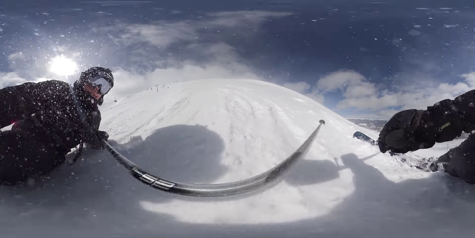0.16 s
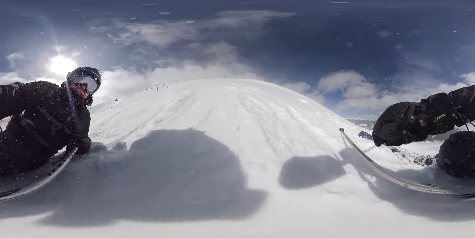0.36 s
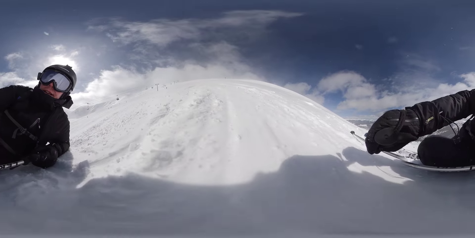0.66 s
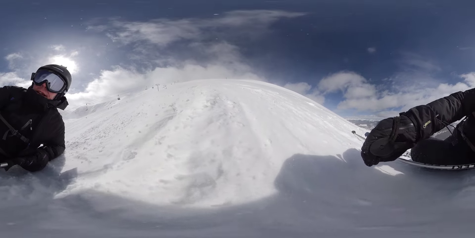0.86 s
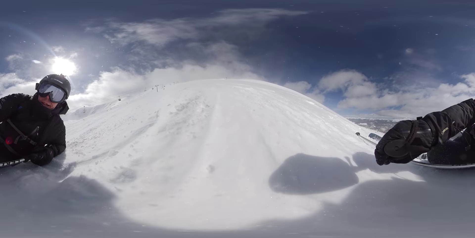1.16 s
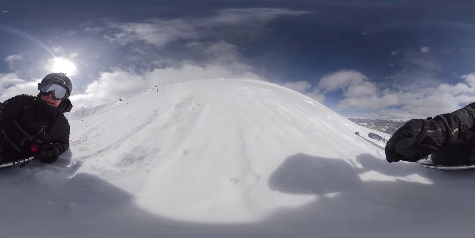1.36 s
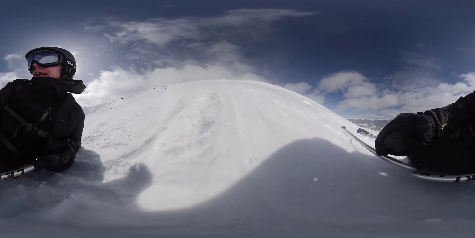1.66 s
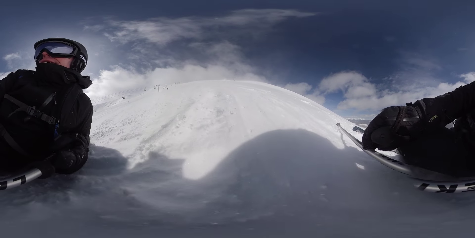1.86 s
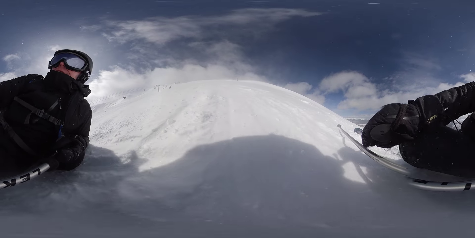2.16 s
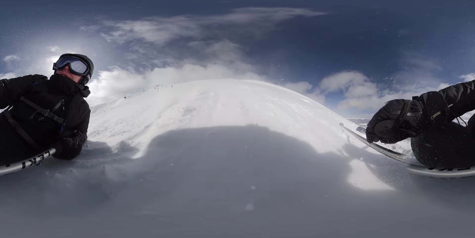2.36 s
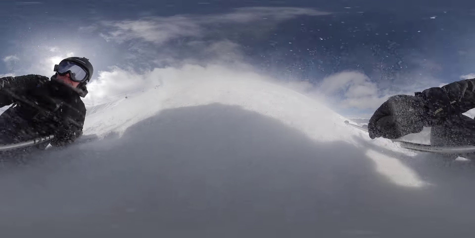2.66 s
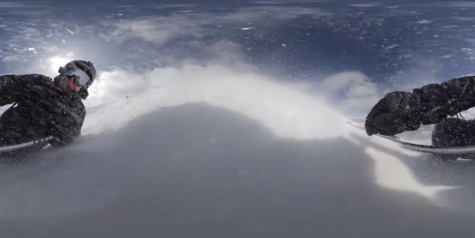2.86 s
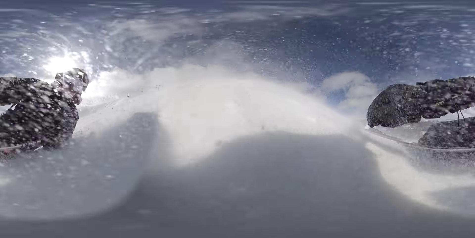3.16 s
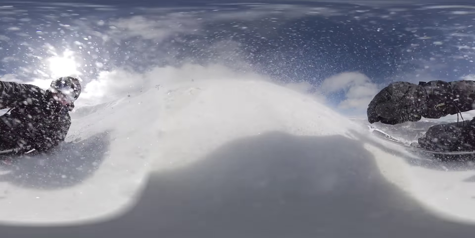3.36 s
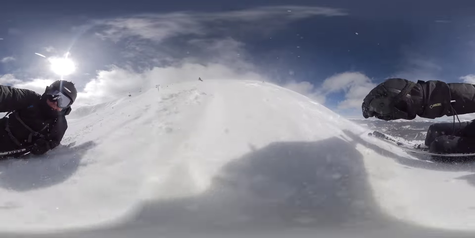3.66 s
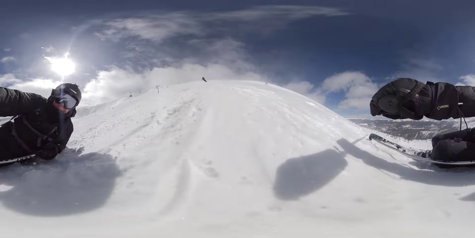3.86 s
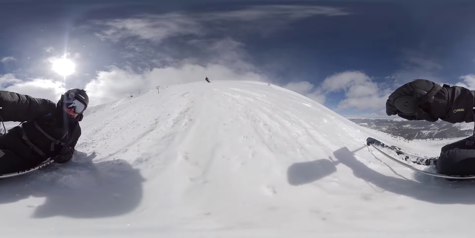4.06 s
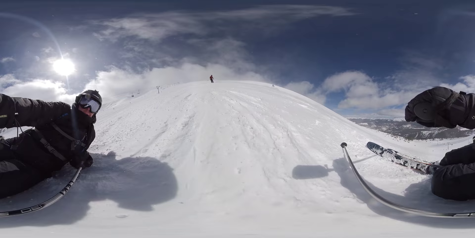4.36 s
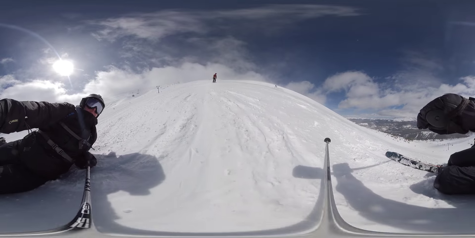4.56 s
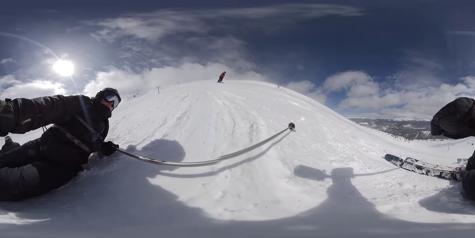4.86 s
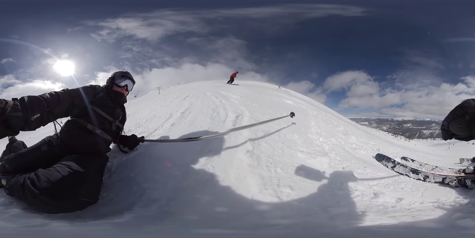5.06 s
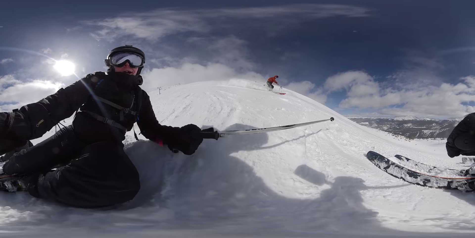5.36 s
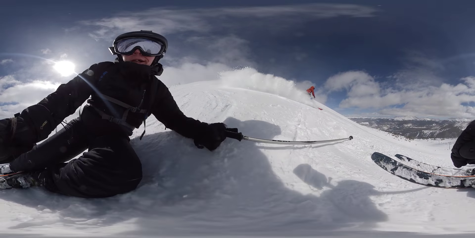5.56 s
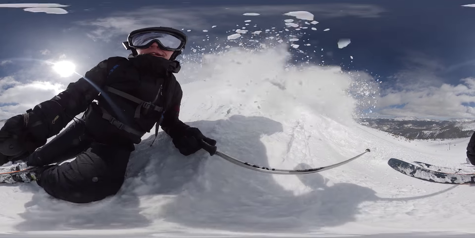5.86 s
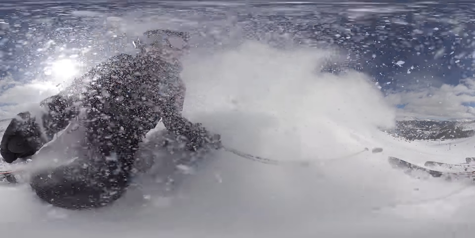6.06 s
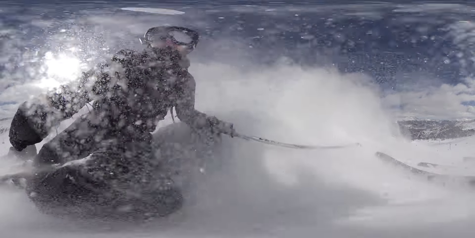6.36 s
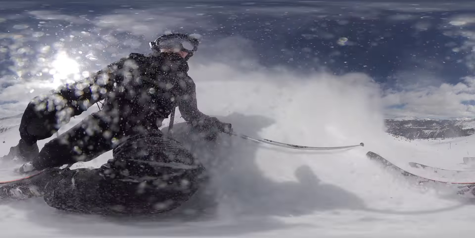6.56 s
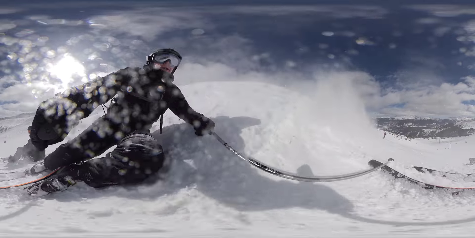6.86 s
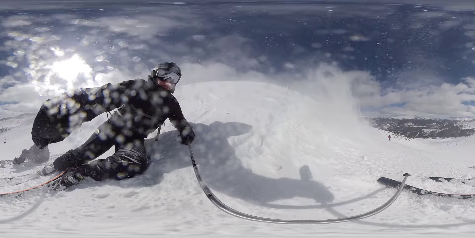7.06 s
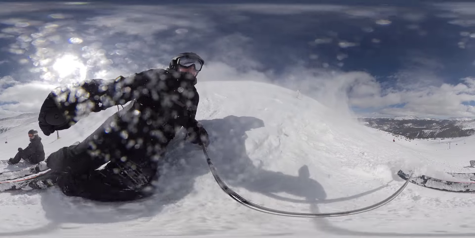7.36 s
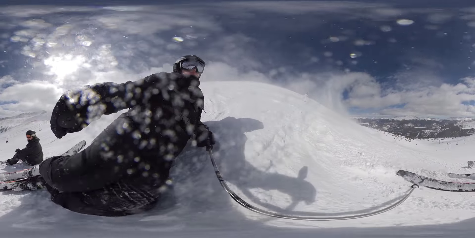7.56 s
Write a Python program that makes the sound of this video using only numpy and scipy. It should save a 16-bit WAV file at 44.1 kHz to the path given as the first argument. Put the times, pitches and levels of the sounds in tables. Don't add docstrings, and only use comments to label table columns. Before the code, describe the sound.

On an open snow slope, a microphone in a small hard housing rides close to skis. Faint powder hiss and low soft wind open, with muffled thuds; clumps crunch with a click around 0.5-0.6 s and dull knocks near 0.75. Ticks follow, a crunch at 1.35, then a very loud cluster of cracks, lumps and a deep thud at 1.66-1.77. Hiss continues with pellets until 2.5 s, when a dense, bright rush of spray bursts in, full of crushed clumps, with hollow gritty scrapes and hard knocks at 3.1-3.55. It ends by 3.8. Quiet follows, with faint wind and small rattling clicks at 4.1-4.7. A second skier's rush grows by 5.5, a hard crack lands at 5.64, three sharp knocks at 6.02-6.1 with a faint brief pole hum, and fine hiss at 6.3. Near silence, then taps and crunch at 7.1 and light gliding hiss to the end.

```python
import sys
import numpy as np
from scipy import signal
from scipy.fft import rfft, irfft
from scipy.io import wavfile
from scipy.ndimage import uniform_filter1d

SR = 44100
rng = np.random.default_rng(int(sys.argv[2]) if len(sys.argv) > 2 else 0)


def field_ratio(decibels):
    return 10 ** (np.asarray(decibels, dtype=float) / 20)


def to_wav(s):
    ch = np.atleast_2d(s).T
    pcm = np.round(np.clip(ch, -1, 1) * 32767)
    wavfile.write(sys.argv[1], SR, pcm.astype(np.int16))


N = 339614

# t/s, level/dB, fineness/dB
GLIDE_SPRAY = [(0.0, -49.5, 4), (0.29, -58.5, 3), (0.53, -54.5, -4), (0.66, -58, -7), (0.85, -58, -4),
               (1.54, -45.5, 4), (1.72, -45.5, -1), (2.05, -51.5, 3.5), (2.3, -50, 0.5), (3.85, -66, -4.5),
               (4.19, -64.5, -4.5), (4.52, -60.5, -5.5), (4.72, -70.5, -8.5), (6.93, -67.5, -3),
               (7.24, -50, -3), (7.42, -55, -3.5), (7.61, -50.5, 3.5), (7.7, -56, -5)]
# t/s, level/dB, fineness/dB
TURN_SPRAY = [
    (2.2, -66.5, 6.5),
    (2.485, -38.5, 3.5),
    (2.504, -30, 4),
    (2.67, -30.5, 5),
    (2.85, -31, 6.5),
    (3.02, -28, 3.5),
    (3.27, -31.5, 4),
    (3.58, -33.5, 4),
    (3.85, -71.5, 10.5),
]
# t/s, level/dB, fineness/dB
PASSER_SPRAY = [
    (4.8, -99, 6.5),
    (5.04, -71, 2),
    (5.499, -47.5, -2.5),
    (5.78, -50, -6),
    (5.97, -55, -5.5),
    (6.33, -47, 8),
    (6.47, -55.5, 3.5),
    (6.73, -80.5, -1),
    (6.95, -93, -11),
]
# t/s, level/dB
GUSTS = [(0.0, -63.5), (0.41, -65.5), (0.64, -48.5), (1.02, -64), (1.69, -49.5), (2.05, -58), (2.51, -47.5),
         (3.06, -53), (3.22, -64), (4.55, -67.5), (4.7, -70.5), (6.25, -62), (6.46, -79.5), (6.85, -76),
         (7.05, -68.5), (7.7, -63)]
# f/Hz, level/dB per Hz
WIND_COLOUR = [
    (12, -38),
    (25, -1),
    (72, 3.5),
    (140, -2),
    (287, -10.5),
    (330, -12.5),
    (430, -22.5),
    (730, -120),
]
# t/s, peak/dB, f/Hz
THUDS = [(0.118, -38.5, 52.7), (0.419, -36.5, 78.6), (0.501, -34, 159), (1.212, -37, 46.3),
         (1.474, -40, 94.2), (1.589, -31.5, 61.9), (1.699, -22, 42.6), (1.735, -32, 37.7),
         (2.037, -48, 72.7), (2.239, -35, 88.5), (2.349, -36, 70.0), (2.486, -38, 86.1), (2.599, -39, 59.2),
         (2.854, -55, 78.1), (3.118, -50, 146), (3.54, -35.5, 198), (2.68, -42, 140), (2.93, -42, 110),
         (4.64, -49, 60), (6.53, -55, 60), (6.72, -53, 70), (6.98, -47, 150), (3.646, -38, 32.3),
         (3.77, -44, 58.7), (4.022, -41.5, 59), (4.143, -47, 56.5), (4.383, -41, 48.4), (4.886, -53, 45.8),
         (5.437, -41, 178), (5.734, -42, 64.3), (6.956, -35, 46), (7.06, -51, 37.7), (7.274, -38, 130),
         (7.507, -42.5, 50), (7.619, -66, 88.8)]
# t/s, peak/dB, f/Hz
KNOCKS = [(0.663, -25, 230), (0.743, -23, 227), (0.766, -26.5, 93.5), (1.495, -31.5, 222),
          (1.659, -7.5, 404), (1.668, -17.5, 129), (3.164, -22.5, 450), (3.37, -15.5, 439),
          (5.1, -40.5, 263), (5.293, -36.5, 427), (5.465, -36, 311.7), (5.638, -30, 397),
          (6.0155, -22.5, 200), (0.755, -31.5, 450), (5.75, -41, 400), (6.096, -20, 242), (6.327, -38, 450)]
# t/s, peak/dB, body/dB and hiss/dB relative to shell, left-right/dB
LUMPS = [(0.606, -9.5, -30, -8, -22), (1.6595, -1.5, -0.5, -8, -3), (1.6678, -8, -7, -5.5, 18),
         (1.682, -14, -19, -14, -20.5), (1.6845, -15, -18, -18, -12), (1.696, -11, -34, -19, -12.5),
         (1.708, -7.5, -14, -1.5, -11.5), (1.7152, -6.5, -6.5, -4, -15.5), (1.7257, -8.5, -15.5, -9, -16),
         (1.7291, -2, -17, -8, -12), (1.7714, -7, -10, -5, -17), (2.264, -11.5, -2.5, -0.5, -10.5),
         (2.6581, -7.5, -11, -9.5, -9.5), (3.1284, -17, 12.5, -7.5, -1.5), (3.1692, -18, 21.5, -20, -13),
         (3.3569, -7, 5.5, -6.5, 2.5), (3.3694, -3.5, -4, -18, 21.5), (5.63, -11, -5.5, -24, -8.5),
         (5.639, 0, -18.5, -5.5, -14.5), (6.0162, 3, 1, -9, 3.5), (6.0646, -4.5, -4, -7.5, -8),
         (6.096, 0.5, 0.5, -9.5, -7), (7.0848, -9, 2, -17.5, -12), (1.3408, -5, -9, -15, -9),
         (7.1026, -7.5, -11, -20.5, -11.5), (7.096, -9, -31, -41, -24), (7.1072, -2.5, -10.5, -5.5, -10.5)]
# t/s, peak/dB, body/dB and hiss/dB relative to shell
PELLETS = [(0.2529, -30.5, 4, -10), (0.69, -35.5, 18, -17), (0.6942, -31, -20, 0), (0.73, -33, -26, 8),
           (0.9761, -30.5, -21, 0), (1.012, -28, -21, -5), (1.071, -28, -18, -5.5), (1.4385, -26, -18, -11),
           (1.59, -20.5, -11, 0.5), (1.7, -25, -6, -3), (2.4, -20, -15, -1), (2.435, -28.5, -15, 0),
           (6.0805, -19.5, -10, -2), (6.2542, -20, -3, -3), (6.248, -24, 6, -3), (5.991, -31, -10, 9),
           (6.002, -41, -20, 14), (1.8123, -20.5, -15, -5), (1.86, -17.5, 1, -18), (2.25, -24.5, -21, 1.5),
           (2.3812, -13, -7, -13), (2.4028, -14.5, -8, -24), (2.5007, -15, 1.5, -1), (1.085, -43, -18, 14),
           (2.174, -55, -6, -24), (2.421, -19.5, -26, 0), (6.6508, -41, -21.5, 3.5), (5.726, -26.5, -10, 5),
           (5.985, -39, 9, 16), (6.0446, -28, -20, 9), (6.052, -26, -38, 1), (6.106, -27, -21, 9),
           (6.2905, -30.5, 8, 10.5), (6.3272, -21, -2, 5), (6.49, -31, -25, -5), (0.707, -49, -22, 11),
           (7.1313, -15, -5, -26), (7.141, -23, -8, -20), (1.302, -30.5, -25, 7.5)]
# t/s, peak/dB, body/dB and hiss/dB relative, contact/ms
RATTLES = [
    (4.0637, -35.5, -7, -10, 1.4),
    (4.0871, -22, 0, -3, 0.74),
    (4.362, -24.5, -3.5, -26, 3.3),
    (4.4091, -24, -5, -13.5, 3.3),
    (4.4587, -27, -1, -24, 5),
    (4.115, -36, -16, -10, 1.1),
    (4.6723, -29, 3, -8.5, 1.5),
    (6.075, -27.5, -24, 7, 14),
    (6.754, -36, 11, -19, 6.4),
    (7.63, -41, 9.5, -24, 11),
]
# t/s, peak/dB, body/dB and hiss/dB relative to shell, swell/ms
CLUMPS = [(0.512, -30.5, -13.5, -1, 5), (0.534, -22.5, -9, -5, 5), (0.55, -24.5, -11, -12, 4.5),
          (0.564, -20.5, -3, -9.5, 5.4), (0.587, -21.5, -4, -29, 4), (0.598, -9, -8, -24, 5.7),
          (0.617, -18.5, -5, -12, 4.4), (0.606, -9.5, -8.5, -24.5, 7.5), (0.737, -37.5, 11.5, 12.5, 8.3),
          (0.765, -38, 12, -1, 13), (1.325, -15, -11, -18, 3.5), (1.351, -14, -6.5, -13, 4),
          (1.377, -17, -5.5, -16, 6.7), (1.338, -5, -4, -14, 6), (1.3625, -8.5, -15, -13.5, 2.5),
          (1.663, -9, 5.5, 3.5, 3.9), (1.722, -13, -15, -20.5, 3), (1.734, 0, -18, -15.5, 3.1),
          (2.369, -23.5, -2.5, 7.5, 15), (2.51, -18, -4, 6.5, 10), (2.579, -17, -0.5, 4.5, 18),
          (2.619, -15, 2, 6, 12), (2.736, -13.5, -1, 3.5, 20), (2.776, -11, -6.5, 2.5, 14),
          (2.83, -18.5, -5.5, 1, 13), (2.882, -15.5, -10.5, 1.5, 9.1), (2.943, -10.5, -5.5, 5.5, 12),
          (3.009, -11.5, -7.5, 3, 24), (3.08, -14.5, -4.5, 4.5, 8.5), (4.591, -38, 0.5, -9, 21),
          (4.662, -38.5, 0.5, -7, 35), (5.635, -7.5, -7.5, -16, 7.2), (5.649, -18, -6, -8, 5),
          (5.6599, -15, 0.5, -5, 4.7), (6.2051, -26, 8, 0, 3.5), (6.252, -16, -2.5, -3.5, 11.6),
          (6.3063, -21.5, -3.5, 4, 15), (7.081, -22.5, -3, 1.5, 7.94), (7.101, -8, -13, -17, 6.04),
          (7.1316, -23, -8, -7, 31)]
# t/s, peak/dB, brightness/dB, rise/ms, fall/ms
SLIPS = [(3.127, -6, 0.5, 0.6, 7), (3.136, -7.5, -2, 1.6, 6.6), (3.149, -21.5, 2.5, 5, 6.8),
         (3.183, -16.5, 1.5, 3.1, 10), (3.171, -11, 2.5, 6, 7.9), (3.198, -15.5, 0, 8, 4.5),
         (3.357, -9.5, -6.5, 0.44, 11), (3.374, -19, 8.5, 6.1, 4.3), (3.404, -17.5, 3, 11, 4.3),
         (3.417, -8, 3, 7, 11), (3.433, -15.5, -4, 5, 5.6), (3.447, -11, 0.5, 7.7, 8.5),
         (3.461, -14.5, -3, 7.1, 4.5), (3.477, -19.5, 6, 6.6, 5.2), (3.496, -13, -0.5, 9.4, 10.6),
         (3.52, -15, -2, 7, 4.3), (3.535, -13, 0, 2.3, 3.2), (3.545, -8.5, -2, 5.5, 8.3),
         (3.57, -20, 6, 36, 4.9)]
# t/s, f/Hz, level/dB
POLE_HUM = [
    (6.11, 136.8, -60),
    (6.254, 135.5, -55),
    (6.3, 133, -73),
]
# f/Hz, width/Hz, level/dB, left-right/dB, left pitch ratio
BODY_MODES = [
    (626, 240, -12, 2, 0.73),
    (845, 228, -5.5, -3.5, 0.794),
    (1043.5, 132, 0, 1, 1.063),
    (1184, 160, -3, 3, 1.022),
    (1586, 180, -7, 9, 0.886),
]
SHELL_MODES = [
    (1720, 1280, -5.5, 3, 0.8),
    (2227, 243, 5, 3, 0.9),
    (2665, 396, 2.5, -0.44, 0.91),
    (3103, 750, 0, -2.2, 0.99),
    (3983, 770, -7, -1, 1.02),
]
HISS_MODES = [
    (4740, 1500, 2, 3, 0.91),
    (5010, 860, -35.5, 5, 0.16),
    (6300, 1300, -9, -1, 0.6),
    (7660, 1020, 10, -0.04, 0.73),
    (8420, 1940, 6, -0.25, 1.087),
    (9610, 250, 6, -1, 0.49),
    (10210, 260, 0, 1, 1.2),
]


def rms_one(x):
    return x / np.sqrt(np.mean(x ** 2) + 1e-20)


def in_time(rows, outside=None):
    s, *columns = np.transpose(rows)
    return [np.interp(np.arange(N) / SR, s, c, outside, outside) for c in columns]


def drift(rate_hz):
    r = np.exp(-2 * np.pi * rate_hz / SR)
    wander = signal.lfilter([1], [1, -2 * r, r * r], rng.standard_normal(N + SR))
    return rms_one(wander[SR:])


def sides(pan_db):
    return field_ratio(np.array([pan_db / 2, -pan_db / 2]))


def grains(per_s, spread_db, alike):
    size_db = spread_db * np.minimum(rng.exponential(1, (3, N)), 5)
    sizes = field_ratio(size_db) * rng.standard_normal((3, N))
    both, left, right = sizes * (rng.random((3, N)) < per_s / SR)
    return rms_one(np.sqrt(alike) * both + np.sqrt(1 - alike) * np.array([left, right]))


def spray():
    gust_db = 1.0 * drift(5.1) + 1.4 * drift(37)
    flicker_db = np.array([1.5 * drift(3.0), 1.2 * drift(2.5), 1.0 * drift(6.0)]) + gust_db + 1.5
    strength = 0
    for level_db, fine_db in map(in_time, [GLIDE_SPRAY, TURN_SPRAY, PASSER_SPRAY]):
        body_db = -2.5 - 0.91 * fine_db
        ranges_db = level_db + np.array([body_db, 0 * fine_db, fine_db])
        strength = strength + field_ratio(ranges_db + flicker_db)[:, None] * sides(-11 + 0.62 * fine_db)
    return strength * grains(per_s=11000, spread_db=2.5, alike=0.35)


def mid_side(mid, side, width):
    return rms_one(mid + width * side * [[1], [-1]])


def wind():
    hz = np.maximum(np.fft.rfftfreq(N, 1 / SR), 1)
    points_hz, points_db = np.transpose(WIND_COLOUR)
    colour = field_ratio(np.interp(np.log(hz), np.log(points_hz), points_db))
    mid, side = irfft(rfft(rng.standard_normal((2, N))) * colour, N)
    lumps = field_ratio(in_time(GUSTS)[0] + 2.5 * drift(11) + 2.5 * drift(25) + 2.5)
    return lumps * mid_side(mid, side, width=0.6)


def slope():
    ski_db = np.maximum(in_time(GLIDE_SPRAY)[0], in_time(PASSER_SPRAY)[0])
    follow_db = 0.29 * (ski_db - ski_db.mean())
    band = signal.butter(2, [230, 850], "band", fs=SR, output="sos")
    mid, side = signal.sosfilt(band, rng.standard_normal((2, N)))
    return field_ratio(-59.5 + follow_db + 2.4 * drift(4.3)) * mid_side(mid, side, width=0.85)


def pushes(table, late_s, turns, gain_db, pan_db):
    out, t = np.zeros(N + SR), np.arange(SR // 4) / SR
    for s, db, hz in table:
        at = round((s + late_s) * SR)
        swing = np.sin(2 * np.pi * hz * t) * np.exp(-hz * t / turns)
        out[at:at + SR // 4] += field_ratio(db + gain_db) * swing
    return out[:N] * sides(pan_db)[:, None]


def thuds():
    deep = pushes(THUDS, late_s=0.024, turns=0.6, gain_db=3.0, pan_db=2.5)
    return deep + pushes(KNOCKS, late_s=0.0018, turns=0.48, gain_db=1.5, pan_db=5.5)


def add(strength, s, levels_db, pan_db, rise_ms, fall_ms):
    rise = max(rise_ms, 0.05) * SR / 1000
    fall = max(fall_ms, 0.2) * SR / 1000
    i = np.arange(-int(7 * rise), int(7 * fall))
    shape = np.exp(np.where(i < 0, i / rise, -i / fall))
    gains = field_ratio(np.array(levels_db))[:, None, None] * sides(pan_db)[:, None]
    strength[:, :, round(s * SR) + i] += gains * shape


def taps():
    strength = np.zeros((3, 2, N))
    shards = grains(per_s=23000, spread_db=2.0, alike=0.82)
    lump_ms, pellet_ms, pellet_pan_db, rattle_pan_db = 1.8, 1.1, -9, -9.5
    hits = [(*row, lump_ms) for row in LUMPS]
    hits += [(*row, pellet_pan_db, pellet_ms) for row in PELLETS]
    hits += [(*row[:4], rattle_pan_db, row[4]) for row in RATTLES]
    for s, db, body_db, hiss_db, pan_db, contact_ms in hits:
        levels_db = db - 7.5 + np.array([body_db - 2.0, 0, hiss_db])
        fall_ms = contact_ms + 0.06 * hiss_db
        add(strength, s + 0.00062, levels_db, pan_db, 0.3, fall_ms)
    click = np.zeros(N)
    click[[round((row[0] + 0.0008) * SR) for row in hits]] = 5.0
    click[[round((row[0] + 0.0008) * SR) for row in RATTLES]] = 8.1
    return strength * (shards + click)


def crunch():
    strength = np.zeros((3, 2, N))
    for s, db, body_db, hiss_db, swell_ms in CLUMPS:
        levels_db = db - 9.5 + np.array([body_db, 0, hiss_db])
        add(strength, s + 0.0012, levels_db, -7.5, swell_ms, 0.9 * swell_ms)
    return strength * field_ratio(0.67 * drift(110)) * grains(per_s=12000, spread_db=2.0, alike=0.65)


def plough():
    strength = np.zeros((3, 2, N))
    for s, db, bright_db, rise_ms, fall_ms in SLIPS:
        levels_db = db + np.array([0, -6 + bright_db, -9.5 + bright_db])
        add(strength, s, levels_db, 0, rise_ms, fall_ms)
    pans = np.array([sides(1.2), sides(-1.5), sides(-12.0)])[:, :, None]
    rub = grains(per_s=9000, spread_db=2.5, alike=0.88)
    push = signal.lfilter(*signal.iirpeak(1130, 2.6, fs=SR), rub)
    push = push / np.sqrt(uniform_filter1d(push ** 2, size=180) + 1e-6)
    return strength * field_ratio(0.6 * drift(80)) * pans * np.array([0.21 * push, rub, rub])


def hum():
    hz, db = in_time(POLE_HUM)
    sounding = in_time([(POLE_HUM[0][0], 1), (POLE_HUM[-1][0], 1)], outside=0)[0]
    sounding = uniform_filter1d(sounding, size=600)
    return np.sqrt(2) * sounding * field_ratio(db) * np.sin(2 * np.pi * np.cumsum(hz) / SR)


def lagged(force, samples):
    return np.stack([np.roll(force[:, 0], samples, axis=-1), force[:, 1]], axis=1)


def housing(force, modes):
    out, unit = np.zeros((2, N)), np.zeros((2, 4096))
    for k, (hz, width, db, pan_db, ratio) in enumerate(modes):
        r = np.exp(-np.pi * width / SR)
        for side, pitch in enumerate([hz * ratio, hz]):
            gain = (-1) ** k * field_ratio(db) * sides(pan_db)[side]
            b = gain * (1 - r * r) / 2 * np.array([1, 0, -1])
            a = [1, -2 * r * np.cos(2 * np.pi * pitch / SR), r * r]
            out[side] += signal.lfilter(b, a, force[side] + 1e-18)
            unit[side] += signal.lfilter(b, a, signal.unit_impulse(4096))
    return out / np.sqrt(np.sum(unit ** 2) / 2)


def scene():
    forces = lagged(spray() + crunch(), 16) + lagged(taps(), 15) + lagged(plough(), -1)
    ranges = zip(forces, [BODY_MODES, SHELL_MODES, HISS_MODES])
    shaken = sum(housing(force, modes) for force, modes in ranges)
    return shaken + wind() + slope() + thuds() + hum()


def coarse(x, size, group, step_db, scatter_db, top_hz):
    window = np.sin(np.pi * (np.arange(size) + 0.5) / size)
    hz, _, lines = signal.stft(x, SR, window=window, nperseg=size)
    band, frame = (hz // 350).astype(int), np.arange(lines.shape[2]) // group
    power = uniform_filter1d(np.abs(lines) ** 2, size=max(size // 128, 1), axis=1)
    power = uniform_filter1d(power, size=group, axis=2)
    luck_db = scatter_db * rng.standard_normal((band[-1] + 1, frame[-1] + 1))[band][:, frame]
    rough_db = 5 * np.exp(-((hz - 5600) / 900) ** 2) - 14 * np.exp(-hz / 1800)
    step = np.sqrt(power) * field_ratio(step_db + luck_db + rough_db[:, None]) + 1e-12
    height = np.abs(lines) / step + 1e-12
    lines = lines * np.round(height) / height * (hz < top_hz)[:, None]
    return signal.istft(lines, SR, window=window, nperseg=size)[1][:, :N]


def camera_processing(x):
    fast = uniform_filter1d(np.sum(np.diff(x, prepend=0) ** 2, axis=0), size=128)
    before = np.roll(uniform_filter1d(fast, size=1024), 640)
    jumps = (fast > before * field_ratio(17.5)).astype(float)
    sudden = uniform_filter1d(jumps, size=1500) > 1e-9
    sudden = uniform_filter1d(sudden.astype(float), size=256)
    steady = coarse(x, size=2048, group=1, step_db=4.5, scatter_db=5.5, top_hz=9900)
    bursts = coarse(x, size=256, group=8, step_db=1.5, scatter_db=6, top_hz=10750)
    return (1 - sudden) * steady + sudden * bursts


def low_pass(x):
    return signal.sosfilt(signal.butter(12, 10920, fs=SR, output="sos"), x)


def record(dry):
    cut = signal.sosfilt(signal.butter(2, 36, "high", fs=SR, output="sos"), dry)
    flattened = cut / (1 + (cut / 0.9) ** 6) ** (1 / 6)
    mix = np.clip(camera_processing(flattened), -1, 1)
    return low_pass(mix)


dry = scene()
out = record(dry)
to_wav(out)
```